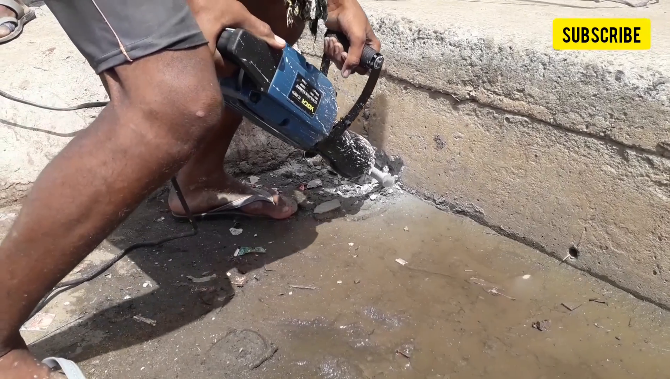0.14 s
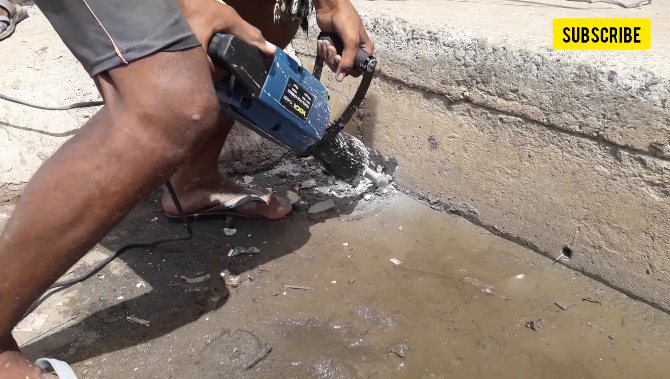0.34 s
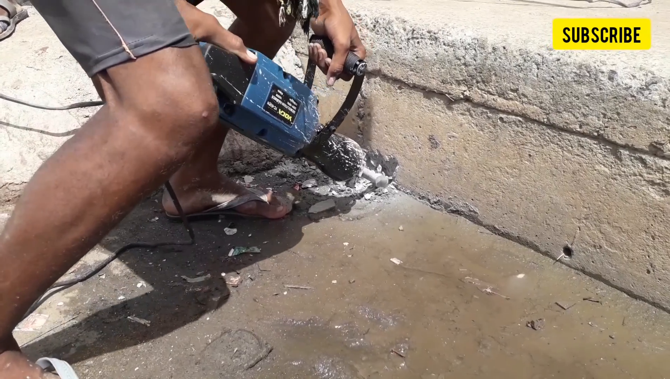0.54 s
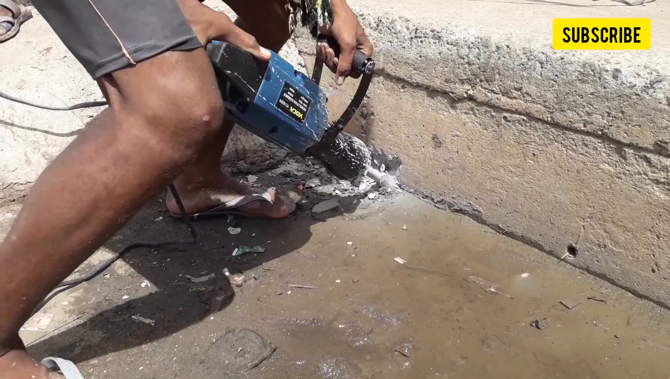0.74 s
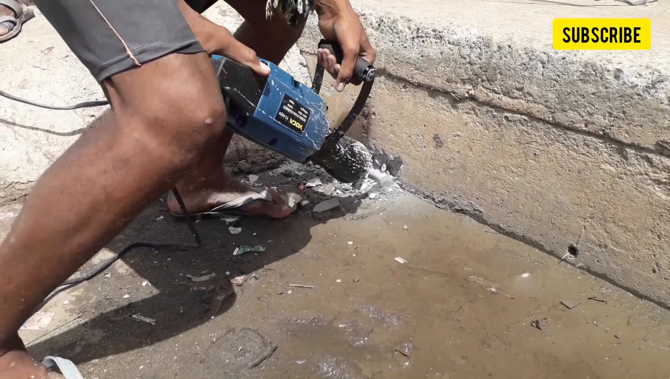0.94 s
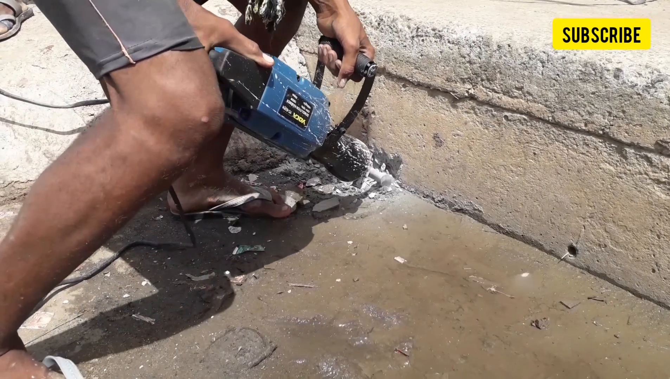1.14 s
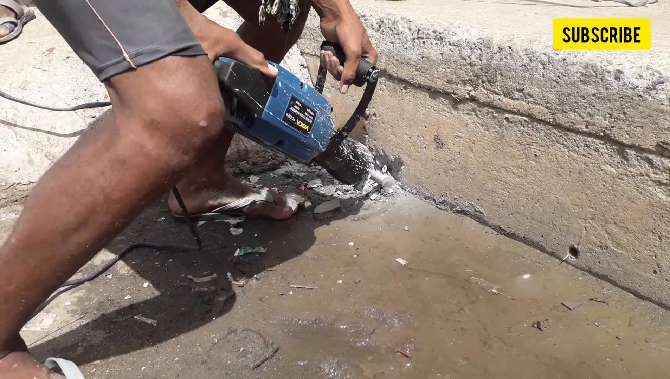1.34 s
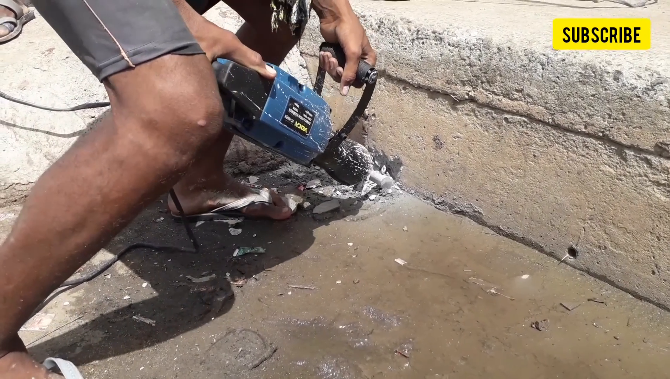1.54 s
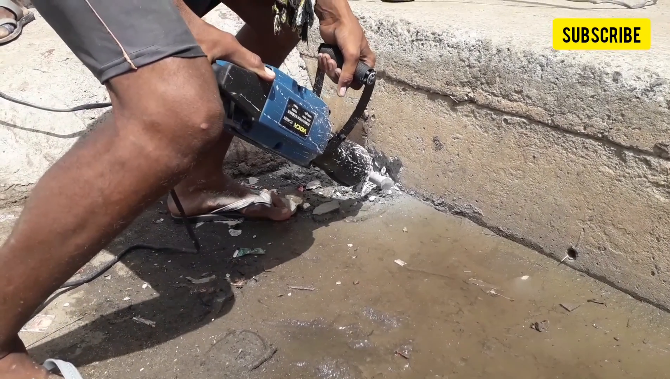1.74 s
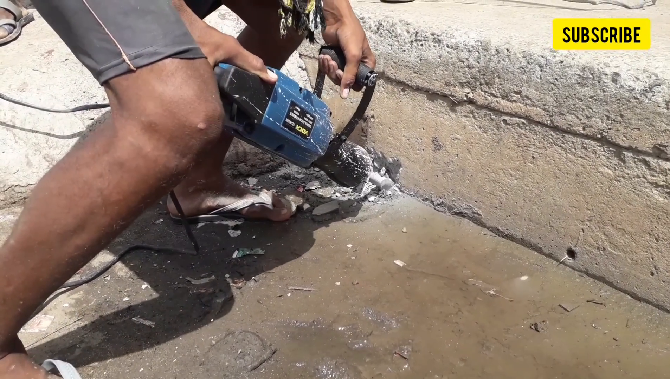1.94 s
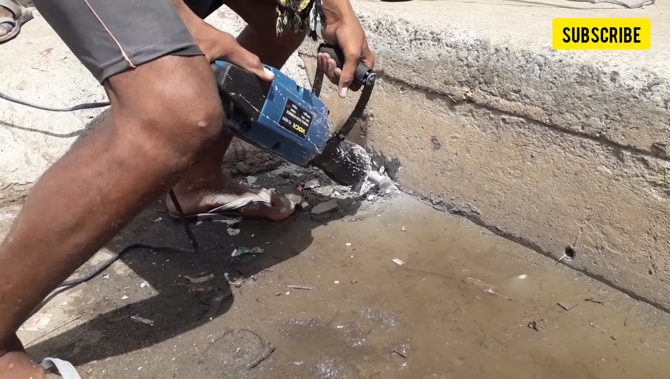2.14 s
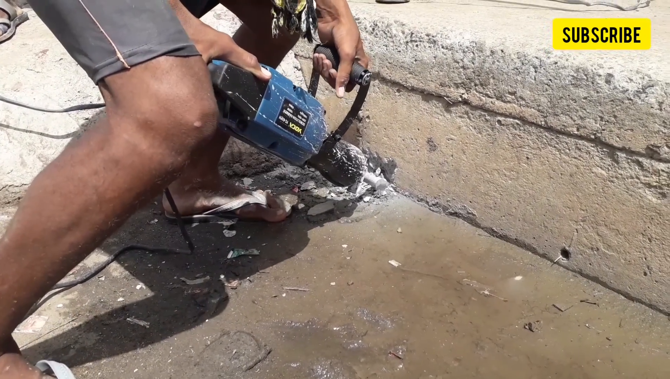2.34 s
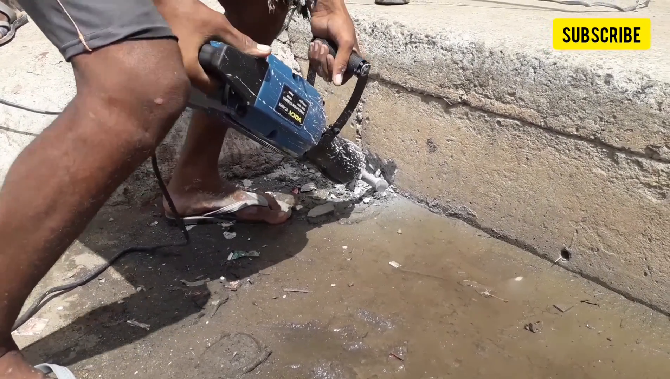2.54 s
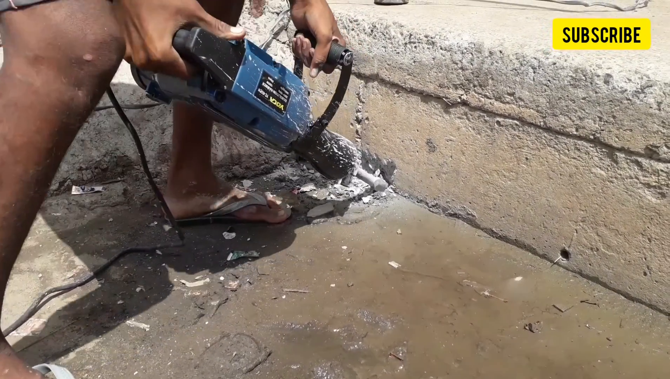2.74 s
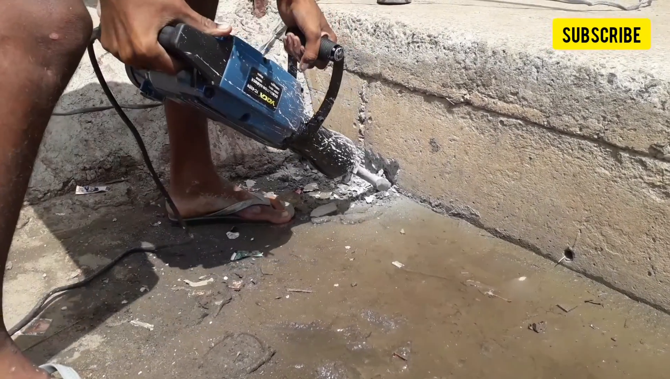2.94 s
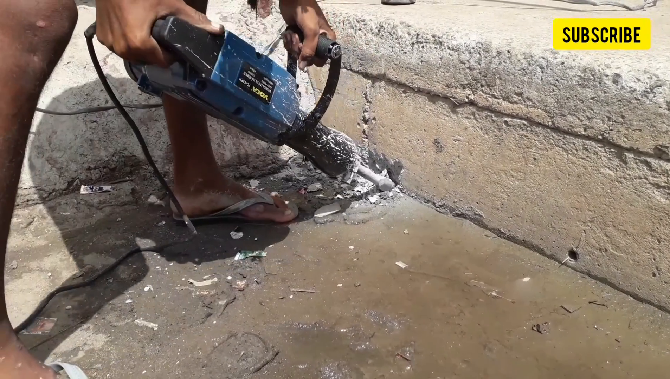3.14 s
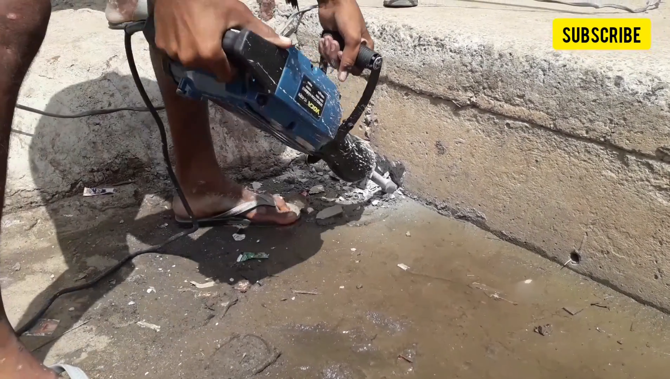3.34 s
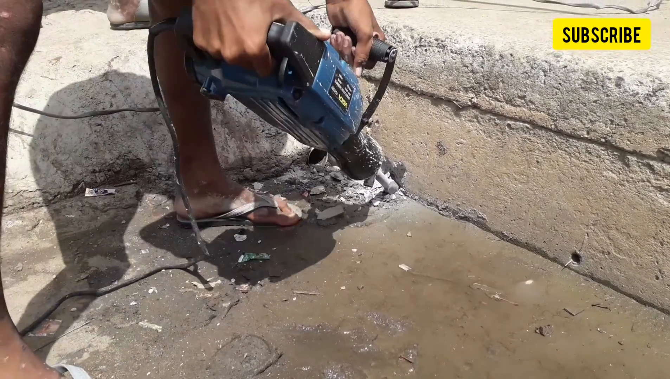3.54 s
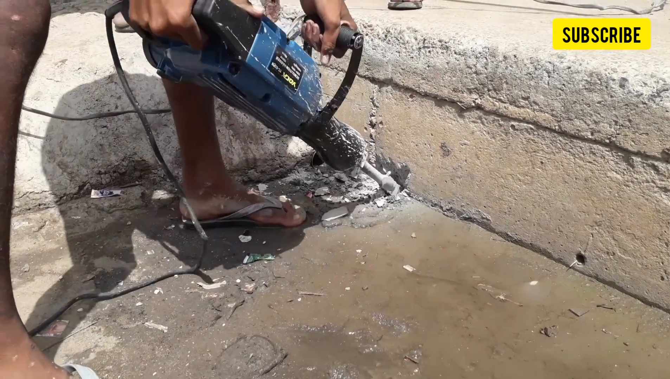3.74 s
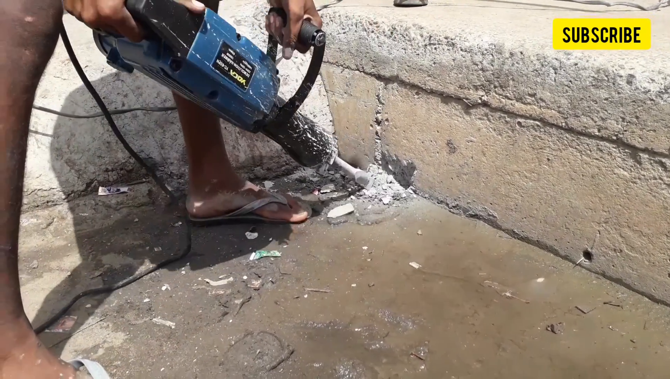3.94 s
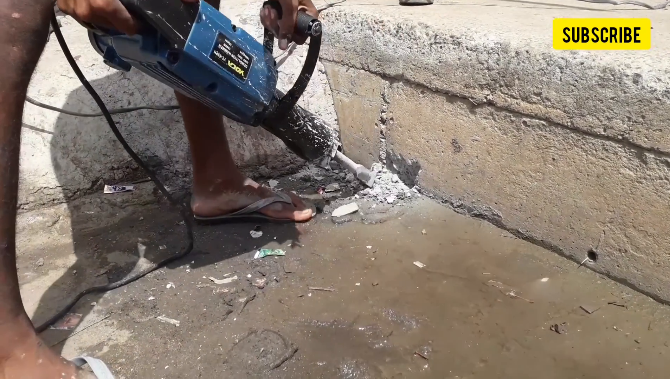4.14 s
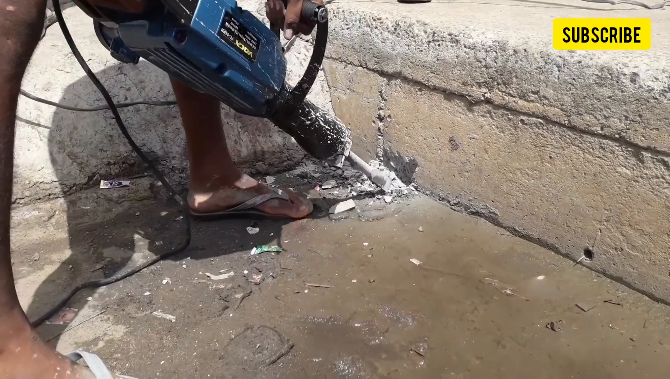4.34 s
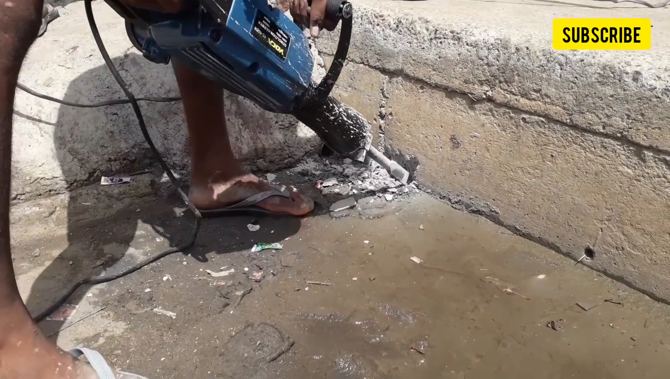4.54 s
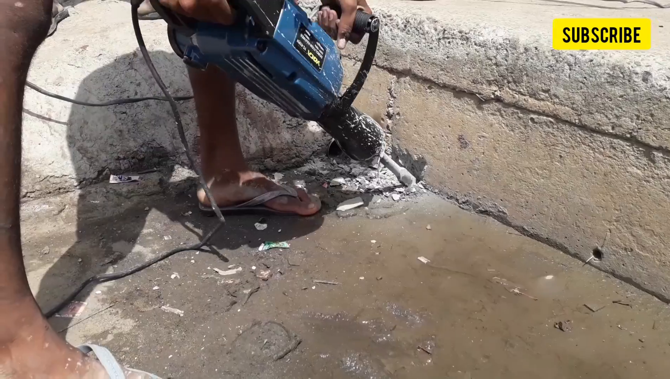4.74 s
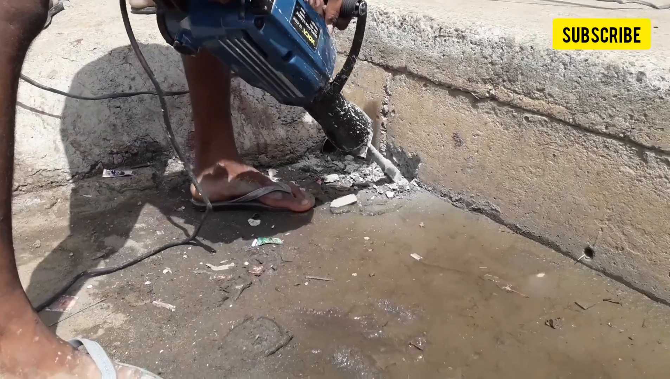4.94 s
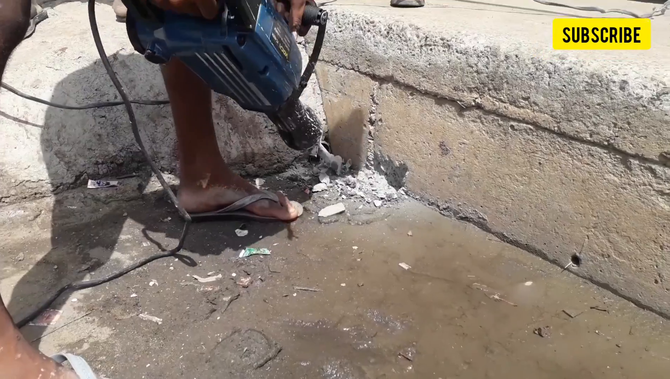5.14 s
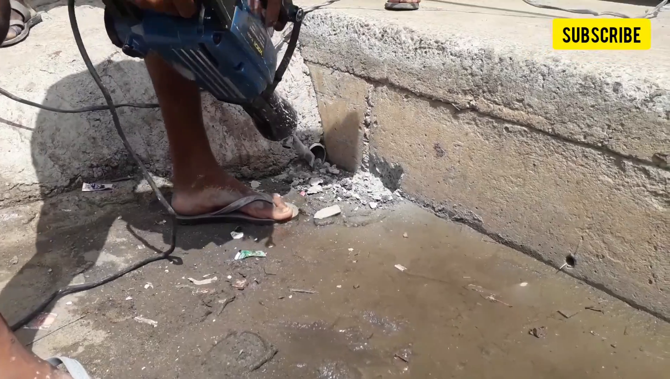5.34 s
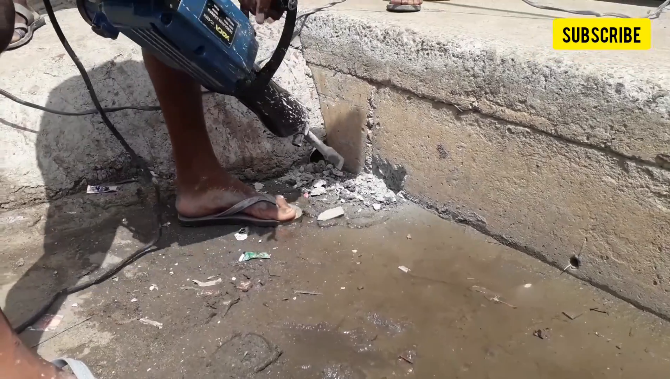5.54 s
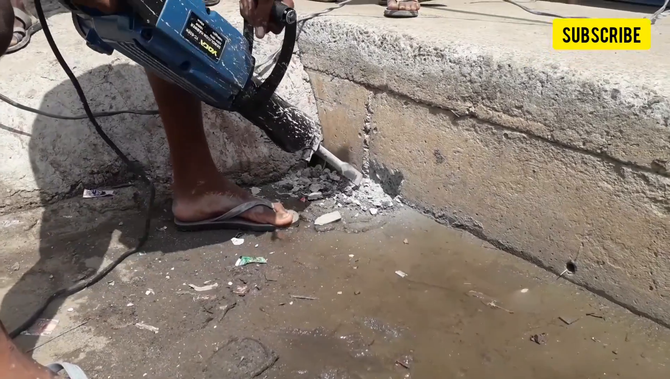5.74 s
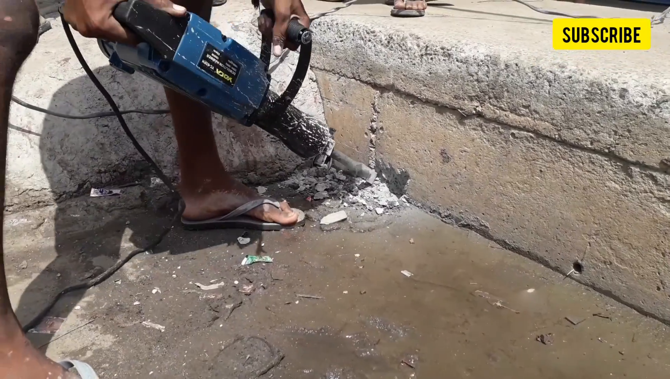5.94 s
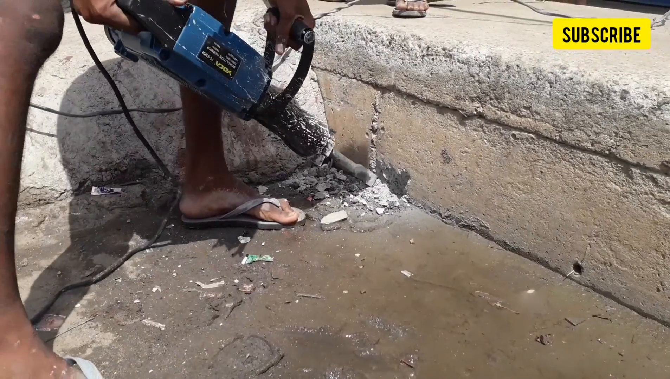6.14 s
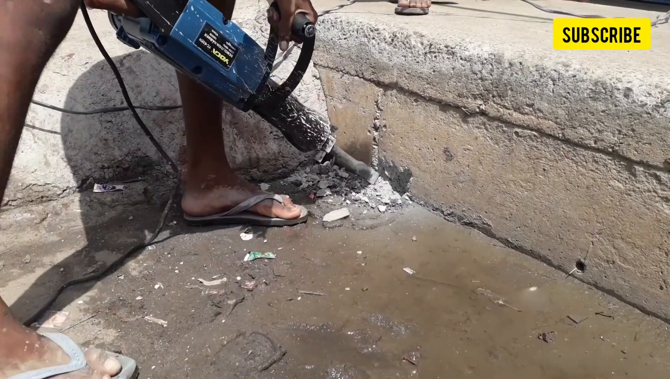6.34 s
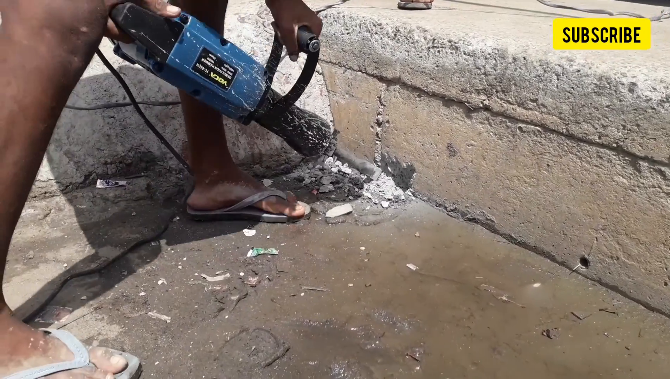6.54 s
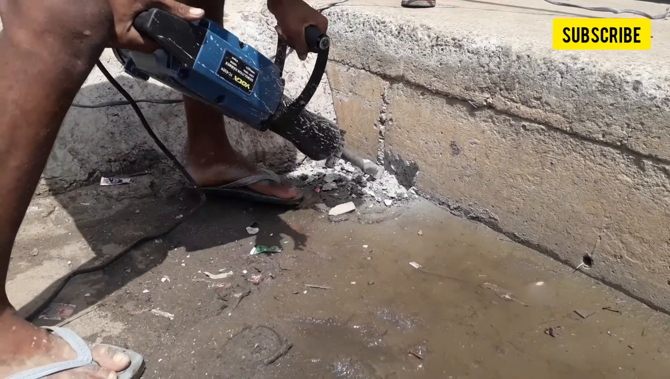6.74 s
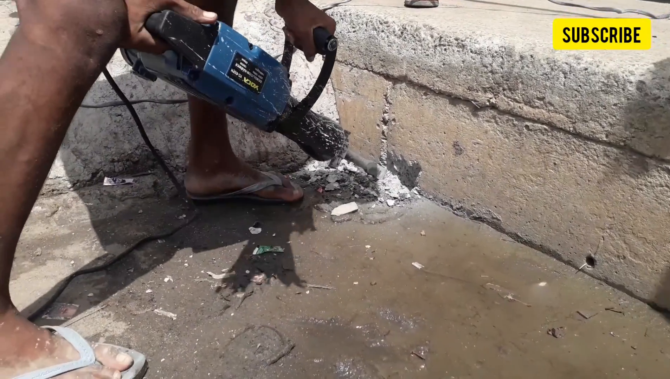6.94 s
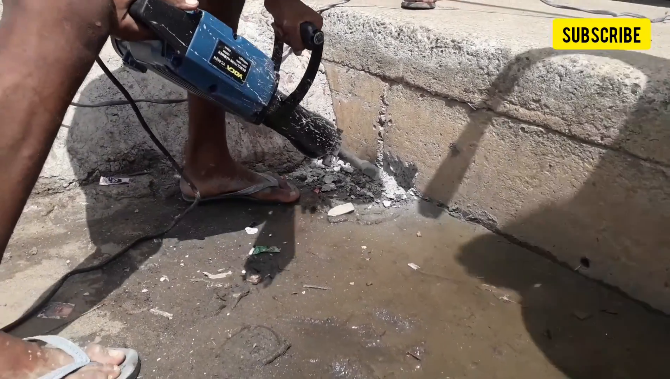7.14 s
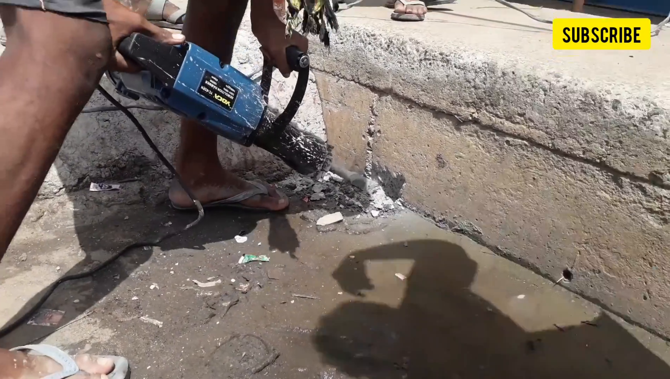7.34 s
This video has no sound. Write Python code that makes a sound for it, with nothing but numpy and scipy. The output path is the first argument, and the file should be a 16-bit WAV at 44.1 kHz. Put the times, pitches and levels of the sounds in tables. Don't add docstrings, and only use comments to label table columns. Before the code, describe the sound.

A roadside concrete drain, near microphone, almost centred, with short wall reflections. Dense machine-gun hammering with gritty crackle and motor roar comes first, then a falling whine and lumpy rundown. A quiet gap holds light steel knocks, dragging scuffs, low traffic rumble, humming generator and a truck accelerating. The tool starts again with a rising whine and several strengthening blows.

```python
import sys
import numpy as np
from scipy import signal
from scipy.io import wavfile

SR = 44100
rng = np.random.default_rng(int(sys.argv[2]) if len(sys.argv) > 2 else 0)


def voltage_ratio(decibels):
    exponent = np.asarray(decibels, float) / 20
    return 10 ** exponent


def to_wav(sig):
    pcm = np.clip(np.atleast_2d(sig), -1, 1) * 32767
    pcm = np.round(pcm).astype(np.int16)
    wavfile.write(sys.argv[1], SR, pcm.T)


N = 330309
HOP = 32
CLOCK = np.arange(N // HOP + 2) * HOP / SR

# (time [s], frequency [Hz], level [dB])
GEAR_MESH = [(0, 3397, -32.5), (.4, 3450, -34), (.9, 3398, -32), (1.3, 3378, -28.5), (1.8, 3403, -28.5),
             (2.44, 3475, -27), (2.52, 3157, -37), (2.7, 2747, -44), (3.0, 2544, -51.5), (3.9, 895, -75.5),
             (6.7, 1506, -81), (6.79, 2908, -55), (6.87, 3140, -47), (6.96, 3280, -29.5), (7.03, 3446, -37),
             (7.15, 3700, -40), (7.22, 3940, -56), (7.27, 4103, -34), (7.38, 4114, -27), (7.49, 3845, -47)]
# (frequency [Hz], width [Hz], level [dB], extra level at free speed [dB])
PANELS = [(700, 19, -2.5, -2.5), (847, 48, 3, 0), (946, 42, 1.5, -2.5), (1294, 120, -1, -5.5),
          (1415, 44, -1, -6.5), (1550, 110, -2, 5), (1730, 15, -11.5, 8.5), (2030, 86, -5, 15),
          (2271, 42, 3, 8), (2523, 110, -1, -0.5), (3208, 91, 0, 1.5), (3514, 150, -1.5, -2),
          (4165, 140, -2.5, 10), (5300, 130, -3, 0.5), (8000, 160, -2, -0.5), (11500, 400, 2.5, 0),
          (12300, 640, 4.5, -2)]


def rms_one(x):
    return x / np.sqrt(np.mean(x ** 2) + 1e-20)


def in_time(rows):
    s, *columns = np.transpose(rows)
    return [np.interp(CLOCK, s, c) for c in columns]


def at_hz(points, hz):
    points = np.array(points)
    return np.interp(np.log(hz), np.log(points[:, 0]), points[:, 1])


def smooth(control):
    steps = np.diff(control)[:, None] * (np.arange(HOP) / HOP)
    return (control[:-1, None] + steps).ravel()[:N]


def drift(rate):
    r = np.exp(-2 * np.pi * rate * HOP / SR)
    noise = rng.standard_normal(N // HOP + 2002)
    return rms_one(signal.lfilter([1], [1, -2 * r, r * r], noise)[2000:])


def bump(middle_s, half_s):
    return np.exp(-((CLOCK - middle_s) / half_s) ** 2)


def resonance(x, hz, width):
    return signal.lfilter(*signal.iirpeak(hz, hz / width, fs=SR), x)


def band_pass(order, low_hz, high_hz, x):
    return signal.sosfilt(signal.butter(order, [low_hz, high_hz], "band", fs=SR, output="sos"), x)


def high_pass(hz, x):
    return signal.sosfilt(signal.butter(2, hz, "high", fs=SR, output="sos"), x)


def clicks(seconds, sizes):
    out = np.full(N, 1e-18)
    at = np.round(np.asarray(seconds) * SR).astype(int)
    np.add.at(out, at[at < N], np.asarray(sizes)[at < N])
    return out


def ring(train, hz, t60):
    r, w = voltage_ratio(-60 / (t60 * SR)), 2 * np.pi * hz / SR
    return signal.lfilter([0, np.sin(w)], [1, -2 * r * np.cos(w), r * r], train)


def fade(seconds, sizes, t60):
    train = np.full(len(CLOCK), 1e-18)
    np.add.at(train, np.minimum(np.round(seconds * SR / HOP).astype(int) + 1, len(train) - 1), sizes)
    return signal.lfilter([1], [1, -voltage_ratio(-60 * HOP / (t60 * SR))], train)


def noise_bank():
    edges, white = np.geomspace(30, 15900, 27), rng.standard_normal((2, N))
    return [(np.sqrt(low * high), band_pass(3, low, high, white[k % 2]))
            for k, (low, high) in enumerate(zip(edges[:-1], edges[1:]))]


def bands(bank, spectrum, shift):
    used = [(hz, noise) for hz, noise in bank if hz > spectrum[0][0]]
    total = np.sqrt(sum(voltage_ratio(2 * at_hz(spectrum, hz)) * noise[::16].var() for hz, noise in used))
    return [(hz, voltage_ratio(at_hz(spectrum, hz)) / total * np.roll(noise, shift)) for hz, noise in used]


def street(bank):
    # (frequency [Hz], density [dB per Hz])
    road_spectrum = [(15, -55.5), (25, -31.5), (48, -17), (89, -4.5), (141, 1.5), (194, -7.5), (324, -8),
                     (587, -19.5), (672, -18), (929, -26.5), (1820, -44), (4570, -50.5), (15800, -60)]
    # (time [s], level [dB])
    road_level = [
        (0.0, -54),
        (7.49, -47.5),
    ]
    # (frequency [Hz], rms level [dB])
    hum_lines = [(96, -53), (143, -58.5), (238, -60.5), (287, -65)]
    # (time [s], firing frequency [Hz], level [dB])
    truck_surge = [
        (5.4, 72.86, -59),
        (5.75, 90.7, -50.5),
        (5.929, 97.6, -43),
        (6.069, 102.6, -50.5),
        (6.219, 107.4, -41.5),
        (6.45, 118.4, -49.5),
        (6.659, 127.4, -51.5),
        (6.82, 141.9, -43),
        (7.05, 124.2, -50.5),
    ]
    # (multiple of firing [1], level [dB])
    engine_orders = [(1, 1), (1.5, -7), (2, -17), (2.5, -18), (4.5, -20)]

    level_db, = in_time(road_level)
    road = sum(noise * smooth(voltage_ratio(level_db + 1.8 * drift(4))) for hz, noise in bands(bank, road_spectrum, N // 5))

    t, hum = np.arange(N) / SR, 0
    for hz, db in hum_lines:
        gain = smooth(voltage_ratio(db + 1.0 + 3.5 * drift(13.0)))
        hum = hum + gain * np.sin(2 * np.pi * hz * t + smooth(0.61 * drift(1.1)))

    first, last = truck_surge[0], truck_surge[-1]
    before, after = (first[0] - .3, first[1], -90), (last[0] + 0.18, last[1], -90)
    hz, truck_db = in_time([before] + list(truck_surge) + [after])
    turn = 2 * np.pi * np.cumsum(smooth(hz * (1 + 0.011 * drift(11)))) / SR
    truck = sum(smooth(voltage_ratio(truck_db + db + 4.5 + 2.2 * drift(9.2))) * np.sin(k * turn) for k, db in engine_orders)
    return road + hum + truck


def free_rod():
    # (frequency [Hz], level [dB], t60 [s])
    free_modes = [(3300, -1, .04), (4940, 1, .04), (5040, 3, .035), (7040, 2, .045), (7700, 0, .05),
                  (9700, -9, .05), (12380, -6, .06), (12900, -9, .025)]
    # (time [s], lower family level [dB], upper family level [dB])
    jolts = [(3.855, -73, -82), (4.356, -84, -99), (4.474, -84, -99), (4.665, -79, -105), (4.716, -69, -76),
             (5.006, -60, -69), (5.04, -72, -82), (5.135, -74, -71), (5.175, -66, -82), (5.22, -59, -86),
             (5.255, -78, -86), (5.285, -80, -85), (6.027, -90, -85)]
    s, lower_db, upper_db = np.transpose(jolts)
    touches = s[:, None] + .025 * rng.random((len(s), 10))
    out = np.zeros(N)
    for hz, db, t60 in free_modes:
        family_db = upper_db if hz > 6000 else lower_db
        size = voltage_ratio(family_db + db)[:, None] * rng.standard_normal(touches.shape)
        build_up = ring(clicks(touches.ravel(), size.ravel()), hz, t60=.011) / 30
        out += ring(build_up, hz, t60)
    return out


def knocks(bank):
    # (time [s], peak level [dB], main frequency [Hz], treble level [dB])
    contacts = [(2.598, -28, 2350, -25), (2.695, -35, 1415, -30), (2.762, -38, 1300, -30),
                (4.354, -39.5, 2600, -28), (4.375, -42, 2600, -30), (4.476, -41, 2520, -30),
                (4.683, -41, 2780, -30), (4.72, -32, 3320, -30), (4.325, -50, 2450, -30),
                (4.522, -50, 2300, -25), (4.875, -58, 3500, -14), (5.122, -38, 900, -25),
                (5.312, -47, 910, -25), (2.622, -13, 152, -57), (4.353, -39, 1510, -11),
                (4.373, -37, 1550, -13), (4.435, -40.5, 2290, -19), (4.472, -38, 1600, -14),
                (4.509, -49, 970, -20), (4.678, -30.5, 1080, -29), (4.717, -29.5, 750, -18.5),
                (5.137, -22.5, 365, -45), (4.917, -35, 810, -47), (5.004, -20, 797, -22),
                (5.049, -48, 724, -14), (5.135, -19, 1126, -12), (5.144, -21, 700, -30),
                (5.169, -31, 710, -17), (5.215, -28.5, 1556, -18.5), (5.252, -31, 785, -17),
                (5.293, -33, 930, -31), (5.969, -34, 776, -45), (6.025, -35, 1100, -30),
                (6.136, -42, 700, -38), (6.168, -46, 960, -38)]
    # (frequency [Hz], density [dB per Hz])
    rubble_spectrum = [(250, -6), (400, 0.5), (700, -3.5), (950, -3), (1200, -10), (1550, -10),
                       (2300, -14.5), (3500, -31), (6000, -36), (15800, -70.5)]
    # (middle time [s], half length [s], level [dB])
    drags = [
        (4.3, 0.19, -61),
        (4.913, 0.07, -67),
        (5.152, 0.19, -58),
        (6.653, 0.17, -65),
        (4.58, .08, -75),
        (6.33, .1, -71),
        (3.2, 0.032, -52),
    ]
    # (frequency [Hz], level [dB], t60 [s])
    body_modes = [(695, -8, 0.038), (935, -4, .05), (1540, -5, 0.058), (2040, -17, 0.036),
                  (2690, -4.5, .05), (3430, -11, 0.071), (4200, -24, .05), (4580, -9, 0.03),
                  (5300, -13, .02)]

    s, peak_db, main_hz, treble_db = np.transpose(contacts)
    rubble = bands(bank, rubble_spectrum, N // 2)
    body = sum(noise * smooth(voltage_ratio(2.1 * drift(29))) for hz, noise in rubble)
    body = rms_one(body + sum(0.79 * resonance(body, hz, width) for hz, width, *_ in PANELS))
    scratch = rms_one(sum(noise for hz, noise in rubble if 3000 < hz < 4900))
    drag = voltage_ratio(-73) + sum(voltage_ratio(db) * bump(at, half) for at, half, db in drags)
    out = body * smooth(drag * voltage_ratio(1.8 * drift(11)))

    age = np.arange(round(.25 * SR)) / SR
    for k, at in enumerate(np.round(s * SR).astype(int)):
        envelope = voltage_ratio(peak_db[k] - 60 * age / 0.081) * np.minimum(age / 0.0026, 1)
        tone = np.sin(2 * np.pi * main_hz[k] * age)
        part = slice(at, at + len(age))
        out[part] += envelope * (0.34 * tone + 0.22 * body[part] + 0.4 * voltage_ratio(treble_db[k]) * scratch[part])

    touches = s[:, None] + rng.uniform(0.00083, 0.016, (len(s), 6))
    signs = rng.standard_normal(touches.shape)
    for hz, db, t60 in body_modes:
        tilt_db = 0.5 * (treble_db + 21.5) * np.log2(hz / 500)
        size = voltage_ratio(peak_db - 30.5 + db + tilt_db + 4.5 * rng.standard_normal(len(s)))
        train = clicks(touches.ravel(), (size[:, None] * signs).ravel())
        out += ring(signal.lfilter([.3], [1, -1.1, .35], train), hz, t60)
    return out


def crank_db():
    # (time [s], dip [dB], bite [dB])
    lurches = [
        (3.815, 5, 1.5),
        (3.846, 12, 1.5),
        (4.035, 1, 9.5),
    ]
    coast_s, coast_speed, coast_loss = 2.69, 14.34, 10.2
    turns = np.arange(0, 9.6, .5)
    speed = np.sqrt(coast_speed ** 2 - 2 * coast_loss * turns)
    share = np.where(turns % 1, 0.34, 1)
    rows = list(zip(coast_s + (coast_speed - speed) / coast_loss, 7.5 * share, 7 * share, 1 / speed))
    rows += [(s, dip_db, bite_db, 0.13) for s, dip_db, bite_db in lurches]
    lengths = .0355 + .042 * np.exp(-np.arange(13) / 2.2)
    starts = 6.72 + np.cumsum(lengths) - lengths
    rows += [(s, 4, 4, 1.73 * turn) for s, turn in zip(starts, lengths)]
    gain_db = 0
    for s, dip_db, bite_db, turn in rows:
        away = abs(CLOCK - s)
        dip, bite = -dip_db * np.exp(-away / (0.089 * turn)), bite_db * np.exp(-away / (0.57 * turn))
        gain_db = gain_db + np.where(CLOCK < s, dip, bite)
    return gain_db


def piston_load(blows):
    load = 0
    for s in blows[0]:
        load = load + bump(s - 0.0038, np.where(CLOCK < s - .007, .006, .004))
    return load


def roar(bank, load, reversal_db):
    # (time [s], level [dB])
    effort = [(0, -27), (2.6, -28.5), (2.67, -38), (3.83, -46.5), (3.85, -38.5), (4.2, -77), (4.3, -91),
              (6.68, -89.5), (6.705, -42.5), (6.79, -34.5), (6.9, -35.5), (7.1, -32), (7.29, -29),
              (7.34, -25.5), (7.49, -23)]
    # (frequency [Hz], density [dB per Hz])
    roar_spectrum = [(28, -28.5), (60, -8), (100, -3.5), (160, -3.5), (260, -2), (500, -5), (900, -4),
                     (1200, -7), (2100, -4), (2900, -5), (4200, -7), (6450, -18.5), (8000, -24),
                     (9340, -42.5), (10800, -37), (12300, -30.5), (15800, -38)]
    # (middle time [s], half length [s], frequency [Hz], level [dB])
    buzzes = [(2.617, .03, 3200, 5), (2.643, 0.052, 3900, 16), (2.676, 0.13, 1310, 19),
              (2.8, 0.14, 950, 12.5), (2.77, .04, 2900, 8), (3.65, .04, 3700, 13), (3.05, 0.07, 2800, 3),
              (3.88, .06, 950, 9), (3.43, 0.054, 700, 19), (3.644, .04, 1330, 10.5), (3.862, 0.025, 740, 8),
              (3.92, 0.098, 2800, 12), (6.88, 0.034, 4200, 9), (6.95, .07, 3200, 8), (7.2, 0.085, 1860, 4)]

    level_db, = in_time(effort)
    off_s, on_s = 2.42, 5.4
    off, = in_time([(off_s - .03, 0), (off_s + .03, 1), (on_s - .1, 1), (on_s, 0)])
    tilt_db = np.clip(-0.5 * (level_db + 33), -26, 0)
    tilt_db = tilt_db - 3 * off * np.clip(CLOCK - off_s, 0, 1.5)
    rattle = drift(76)
    slow = np.minimum(np.log2(in_time(GEAR_MESH)[0] / 3400), 0).clip(-.7)
    start_s = 6.72
    waking_db, = in_time([(start_s - .1, 0), (start_s - .05, -7), (start_s + 0.046, -7), (start_s + 0.26, 0)])
    free, = in_time([(6.65, 0), (7.6, 1)])

    out = np.zeros(N)
    for hz, noise in bands(bank, roar_spectrum, N // 3):
        slope = np.clip(np.log2(hz / 1500) / 1.25, -.3, 2.2)
        bite_db = reversal_db * np.clip(np.log2(hz / 300) / 1.83, 0, 1.3) * (1 if hz < 8500 else .4)
        fizz_db = np.clip(np.log2(hz / 5500), 0, 1) * 1.5 * np.minimum(level_db + 33.5, 0)
        top_db = np.clip(np.log2(hz / 12000) * 2, 0, 1) * 40.5 * slow + (hz > 8500) * waking_db
        chance_db = (1.1 + 1.0 * off) * rattle + 1.82 * drift(32)
        out += noise * smooth(voltage_ratio(level_db + slope * tilt_db + fizz_db + top_db + bite_db + chance_db))

    ticks = (rng.random(N) < 400 / SR) * voltage_ratio(3.1 * rng.exponential(1, N).clip(0, 4)) * rng.choice([-1, 1], N)
    out += smooth(off * voltage_ratio(level_db + reversal_db + 9.5)) * band_pass(5, 500, 4500, ticks)

    out = out - 0.36 * resonance(out, 1120, 1120 / 6.5)
    peaks = np.zeros(N)
    for hz, width, db, free_db in PANELS:
        peaks += smooth(voltage_ratio(db + free_db * free + 4.5 * drift(6.5))) * resonance(out, hz, width)
    for s, half, hz, db in buzzes:
        peaks += smooth(voltage_ratio(db) * bump(s, half)) * resonance(out, hz, hz / 35)
    return (out + peaks) * smooth(voltage_ratio(-5.0) * (1 + .5 * load))


def gears(load, reversal_db):
    # (multiple [1], level [dB], share gated by load [0-1])
    mesh_orders = [(.5, -10, 1), (0.668, -9, 0), (0.941, -14, .6), (1, -2, 1.0), (1.064, -16, .6),
                   (1.499, -15.5, 1.0), (3.65, -33.5, 0.2)]
    hz, level_db = in_time(GEAR_MESH)
    gated, = in_time([(2.52 - .05, .93), (2.52 + 0.12, 0.28)])
    throb = 1 + 0.91 * smooth(1 - gated) * np.cos(2 * np.pi * np.cumsum(smooth(hz)) / 75 / SR)
    out = np.zeros(N)
    for multiple, order_db, share in mesh_orders:
        sag = .03 * share * (.3 - load)
        wobble = .003 + 0.00399 * share + .014 * (1 - gated) * share
        turn = 2 * np.pi * np.cumsum(smooth(multiple * hz * (1 + sag + wobble * drift(60)))) / SR
        gate = np.clip(share * gated, 0, 1)
        wander_db = (-0.5 + .6 * (1.5 - gated)) * drift(22)
        gain = voltage_ratio(level_db + order_db + wander_db + 1.4 * share * reversal_db) * (1 - gate + 3.1 * gate * load)
        out += smooth(gain * (1 + .3 * drift(130))) * np.sin(turn)
    return out * throb


def blow_table():
    # (blows counted [1], time [s])
    beat = [
        (0, .008),
        (9, .3933),
        (27, 1.16),
        (47, 2.0274),
        (57, 2.4583),
    ]
    # (time [s], slab thud level [dB])
    push = [
        (0, -15),
        (.55, -14),
        (.8, -15),
        (1.3, -13.5),
        (1.75, -14),
        (2.1, -13.5),
        (2.5, -13),
    ]
    # (time [s], crack level [dB], upper ring level [dB], lower ring level [dB])
    loose_blows = [(0.307, -16, -36.5, -41), (0.3496, -18, -26, -32.5), (0.4349, -15.5, -38, -41),
                   (0.4771, -19, -25, -31), (0.56, -13, -34, -39), (.604, -15, -43.5, -34.5),
                   (0.6478, -16, -45, -34), (.691, -13.5, -43, -37.5), (0.7334, -18.5, -31, -29),
                   (0.7761, -20, -36, -30), (0.8604, -16.5, -24.5, -31.5), (0.9463, -19.5, -27, -30),
                   (.989, -17.5, -41, -28), (1.0311, -16, -39, -30), (1.076, -17.5, -37.5, -20),
                   (1.203, -15.5, -31, -32), (1.2896, -16.5, -36, -41.5), (1.377, -15, -37, -33),
                   (1.4626, -14.5, -34, -38), (1.549, -18, -40, -22.5), (1.68, -15.5, -34.5, -43),
                   (1.7672, -15, -28.5, -32.5), (1.8117, -18, -35, -35.5), (1.854, -17.5, -46, -30),
                   (1.9412, -16, -30, -31.5), (1.9847, -15.5, -40, -40), (2.113, -14.5, -42, -40),
                   (2.2854, -15, -42, -26), (2.458, -13.5, -22.5, -38)]
    # (time [s], thud, crack, upper ring and lower ring levels [dB])
    end_blows = [
        (2.5036, -14, -18, -25.5, -28),
        (2.556, -15.5, -17.5, -41, -37),
        (2.6194, -26, -21, -62, -66),
        (7.3061, -22, -22.5, -41, -42),
        (7.3369, -24.5, -24.5, -39, -29),
        (7.373, -21, -17, -26, -26),
        (7.407, -16, -17, -28, -32),
        (7.4432, -15, -17, -30, -22),
        (7.4802, -14, -16.5, -41, -41.5),
    ]
    base_lower_db = -39
    count, at = np.transpose(beat)
    s = np.interp(np.arange(count[-1] + 1), count, at)
    luck = rng.standard_normal((len(s), 5))
    push_db = np.interp(s, *np.transpose(push))
    rows = np.stack([s + .0004 * luck[:, 0],
                     push_db + 0.61 * luck[:, 1],
                     push_db - 3 + 0.62 * luck[:, 2],
                     -53.5 + 2.7 * luck[:, 3],
                     base_lower_db + 3.4 * luck[:, 4]], axis=1)
    for row in loose_blows:
        rows[np.argmin(abs(s - row[0])), [0, 2, 3, 4]] = row
    s, thud_db, crack_db, upper_db, lower_db = np.transpose(np.vstack([rows, end_blows]))
    grit_db = -32.5 + 0.23 * (np.maximum(upper_db, lower_db) - base_lower_db) + 0.53 * (crack_db + 16.5)
    grit_db = grit_db + 1.1 * np.minimum(thud_db + 19.5, 0) + 1.5 * rng.standard_normal(len(s))
    return np.stack([s, thud_db, crack_db, grit_db, upper_db, lower_db])


def chisel(table):
    # (frequency [Hz], level [dB], t60 [s], share following the upper ring [0-1])
    rod_modes = [(2740, -6, 0.043, 0.0), (3470, -6, 0.052, 0.06), (5010, 0.5, 0.048, 0.06),
                 (5110, -2.5, 0.027, 0.2), (6990, -9, 0.067, 0.6), (7620, 3, 0.031, 1),
                 (9580, -26.5, 0.042, 0.6), (12100, -12.5, 0.04, 0.2), (12410, -8.5, 0.032, 0.1),
                 (14520, -12, 0.06, .4), (15640, -6.5, .055, .3)]
    s, _, _, _, upper_db, lower_db = table
    lags = rng.uniform(.002, .016, (len(s), 3))
    touches = (s[:, None] + lags).ravel()
    out = np.zeros(N)
    for hz, level_db, t60, upper in rod_modes:
        size = voltage_ratio(upper * upper_db + (1 - upper) * lower_db + level_db + 2.0)
        out += ring(clicks(touches, (size[:, None] * rng.standard_normal(lags.shape)).ravel()), hz, t60)
    return out


def crack(bank, table):
    # (frequency [Hz], density [dB per Hz])
    crack_spectrum = [(240, -32), (400, 1), (439, -7), (588, -4), (850, -1), (1010, -9), (1670, -8.5),
                      (1810, -11.5), (3000, -19.5), (3340, -10.5), (5810, -18.5), (7790, -16.5),
                      (9080, -38.5), (10600, -34.5), (12200, -20.5), (15800, -16)]
    # (frequency [Hz], t60 [s])
    crack_decay = [(400, 0.03), (2000, 0.074), (6000, 0.063), (15000, 0.022)]
    # (frequency [Hz], width [Hz], level [dB])
    spray = [(9710, 170, -5.5), (11400, 570, 1.5), (12240, 70, 8.5), (13560, 150, -6.5), (14760, 70, 3.5),
             (15665, 70, 8.5)]
    s, _, crack_db, grit_db = table[:4]
    crack_db = crack_db + 10 * np.log10(np.clip(1 - voltage_ratio(2 * (-25.0 - crack_db)), .1, 1))
    out = np.zeros(N)
    for hz, noise in bands(bank, crack_spectrum, 0):
        high = np.clip(np.log2(hz / 5000), 0, 1)
        level_db = (1 - high) * (crack_db + 4.5) + high * (grit_db + 13.5)
        bass_db = 6.6 * np.clip(np.log2(hz / 1500), -1.8, 0)
        size = voltage_ratio(level_db + bass_db + 0.34 * rng.standard_normal(len(s)))
        sharp = fade(s, size, t60=0.016) + fade(s + 0.002604, 1.33 * size, t60=0.0083)
        rattle = fade(s + 0.005, (0.32 + 0.1 * high) * size, at_hz(crack_decay, hz))
        patter = fade(s + 0.0074, 0.09 * high * size, t60=0.22)
        out += noise * smooth((1 - 0.2 * high) * sharp + rattle + patter)
    return out + sum(voltage_ratio(db) * resonance(out, hz, width) for hz, width, db in spray)


def thud(table):
    # (frequency [Hz], level [dB], t60 [s], delay [ms])
    slab_modes = [(229, -19.5, 0.035, 0.41), (369.7, -7.5, 0.046, 1), (580, -17, 0.037, 0),
                  (782.7, -10, 0.029, 0.15), (1332, -19.5, 0.011, 0.053), (1550, -19.5, 0.0032, 0.024),
                  (876, -23, 0.027, 0.036), (1666, -32.5, 0.042, 0.045)]
    s, thud_db = table[:2]
    out = np.zeros(N)
    for hz, level_db, t60, start_ms in slab_modes:
        sign = 1 if start_ms > .4 else -1
        size = voltage_ratio(thud_db + 12.5 + level_db + 1.5 * rng.standard_normal(len(s))) * sign
        again = size * voltage_ratio(-4.5 + 0.99 * rng.standard_normal(len(s)))
        first = s + start_ms / 1000
        out += ring(clicks(first, size) - clicks(first + 0.002604, again), hz, t60)
    return out


def scene():
    # (delay [ms], level [dB])
    wall_echo = [(4.6, -21), (9.5, -17), (17, -19.5)]
    bank, table, reversal_db = noise_bank(), blow_table(), crank_db()
    load = piston_load(table)
    blows = thud(table) + crack(bank, table) + chisel(table)
    blows = high_pass(200, blows)
    blows = signal.lfilter(*signal.iirnotch(440, 5.5, fs=SR), blows)
    echoes = sum(voltage_ratio(db) * np.pad(blows, (round(ms * SR / 1000), 0))[:N] for ms, db in wall_echo)
    tool = blows + echoes + gears(load, reversal_db) + roar(bank, load, reversal_db)
    mono = tool + knocks(bank) + free_rod() + street(bank)
    return np.stack([mono, mono])


def top_cut(x):
    return signal.sosfilt(signal.butter(12, 15950, fs=SR, output="sos"), x)


def record(dry):
    hiss = voltage_ratio(-80) * signal.lfilter([1, -.3], 1, rng.standard_normal(N))
    mid = 0.86 * np.tanh((dry[0] + hiss) / 0.9)
    mid = signal.sosfilt(signal.ellip(12, .3, 85, 15800, fs=SR, output="sos"), mid)
    treble = band_pass(8, 5400, 15750, mid)
    side = voltage_ratio(-15.5) * np.pad(signal.lfilter([1, -.15], 1, treble), (300, 0))[:N]
    side = side + voltage_ratio(-52) * np.pad(high_pass(700, mid), (900, 0))[:N]
    return top_cut(np.stack([mid + side, mid - side]))


dry = scene()
out = record(dry)
to_wav(out)
```